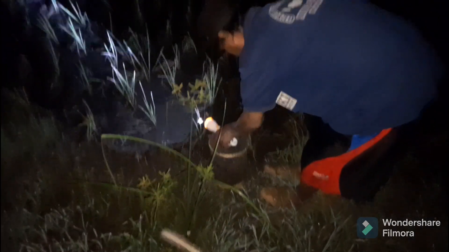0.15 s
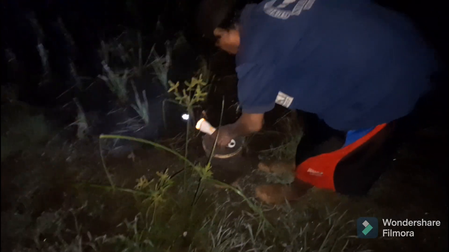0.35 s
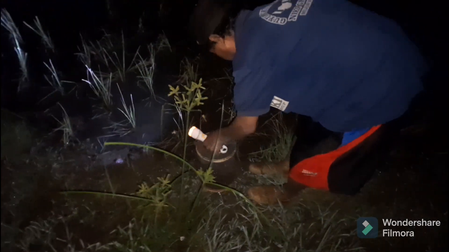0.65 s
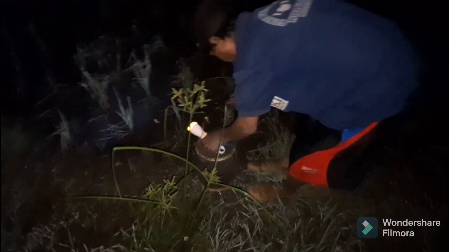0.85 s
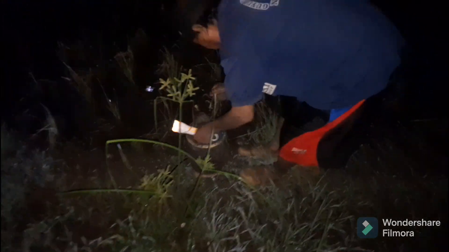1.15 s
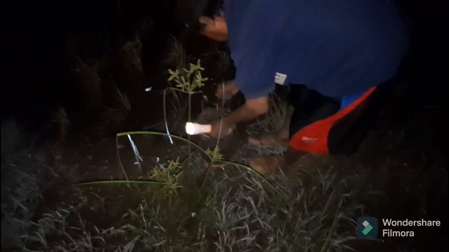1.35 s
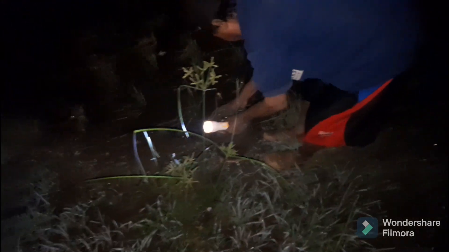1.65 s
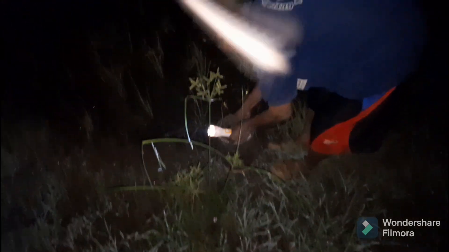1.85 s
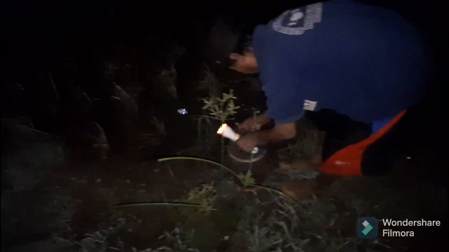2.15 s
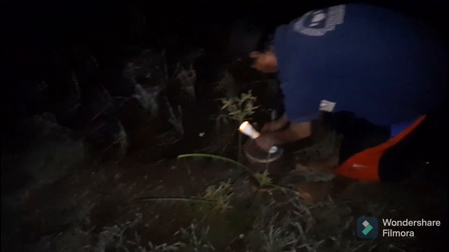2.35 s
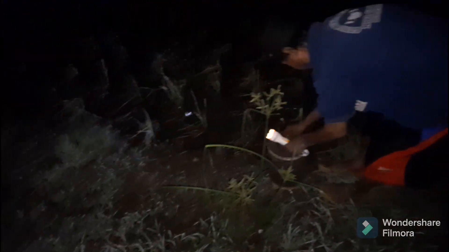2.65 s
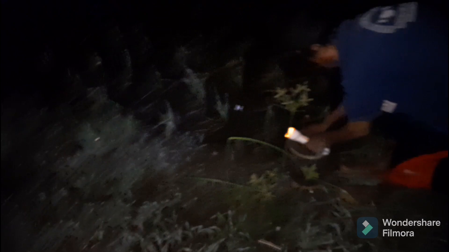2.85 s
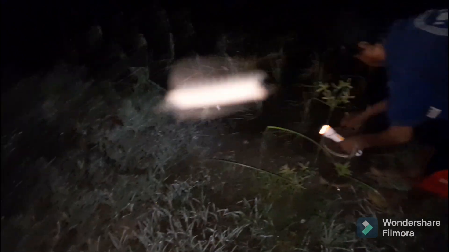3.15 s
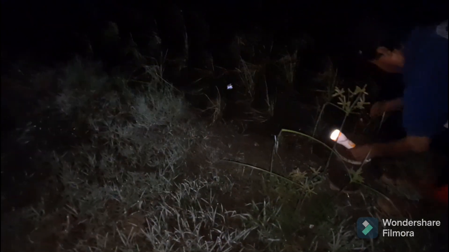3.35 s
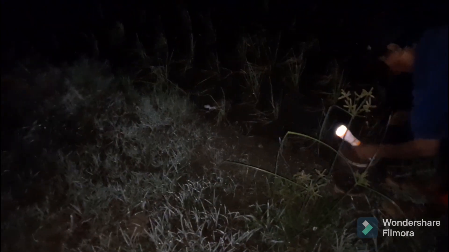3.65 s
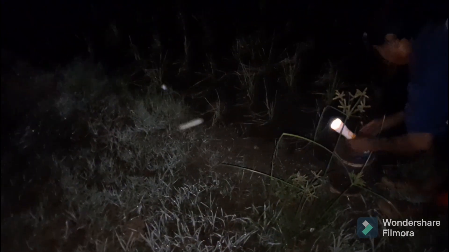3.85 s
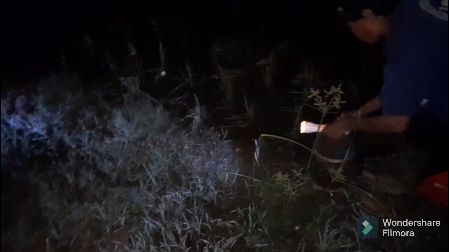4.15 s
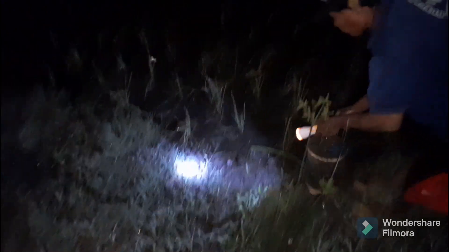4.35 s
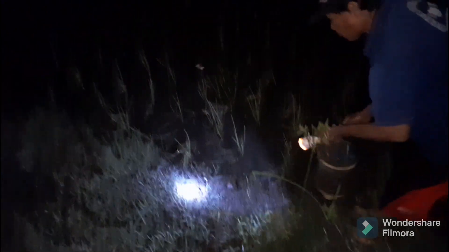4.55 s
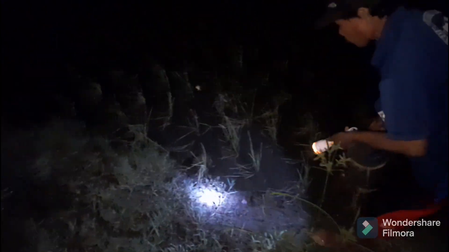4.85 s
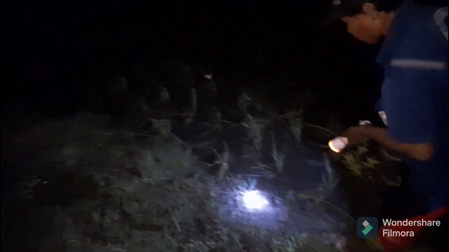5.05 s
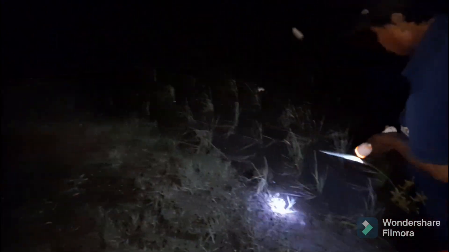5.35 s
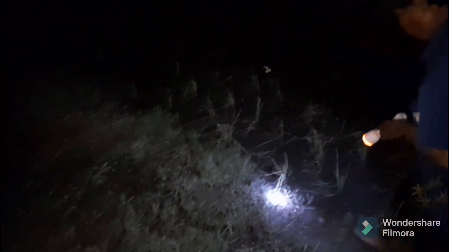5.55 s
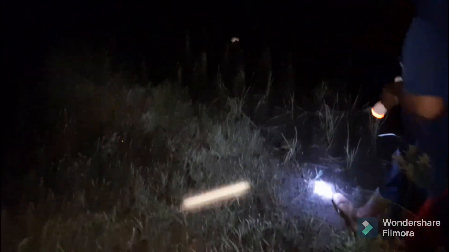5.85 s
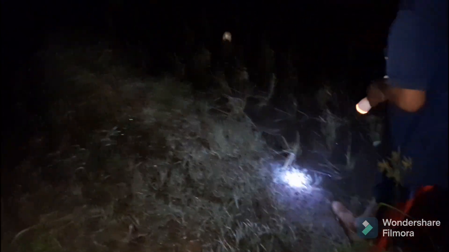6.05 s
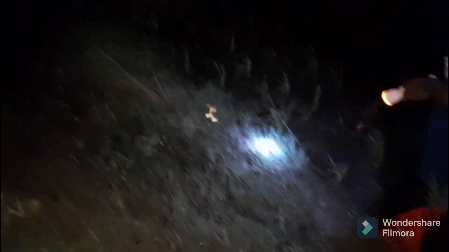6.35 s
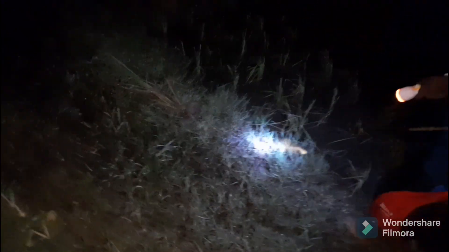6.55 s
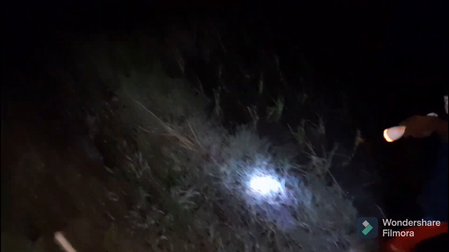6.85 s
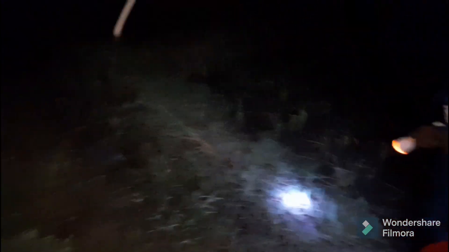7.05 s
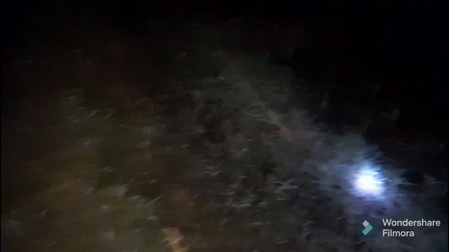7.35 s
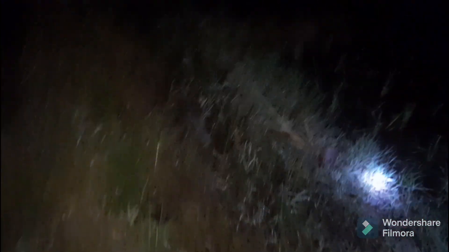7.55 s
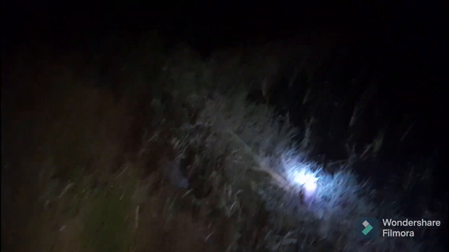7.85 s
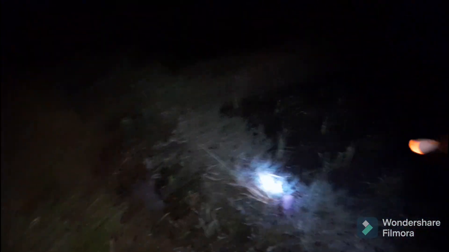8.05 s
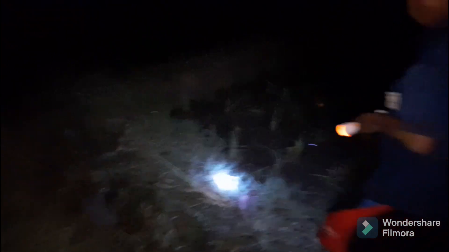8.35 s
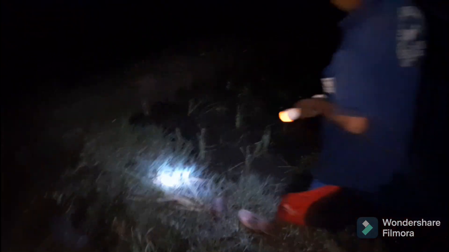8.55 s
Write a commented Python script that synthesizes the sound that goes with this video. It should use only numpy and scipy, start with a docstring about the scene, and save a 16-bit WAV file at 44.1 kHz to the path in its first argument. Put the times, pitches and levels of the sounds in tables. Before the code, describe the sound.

On a river bank at night, crickets drone and chirp over a faint low rumble. Close to the hand-held microphone, rubber boots tread wet ground, tall grass swishes and stalks snap. About a second in, heavy steps thump and a bucket knocks. High insect trills swell midway, the bucket knocks again, and a last few steps land near the end.

```python
"""Night on a river bank, heard on a hand-held phone with two microphone ports. From the start a low
rumble carries from far off, mole crickets drone and small crickets chirp by stridulation. Close by,
rubber boots tread wet ground: tall grass swishes, stalks snap, and near one second heavy steps fall
and a bucket knocks. Midway a boot squeaks and high bush cricket trills swell as the phone turns to
them. After six seconds the bucket knocks again, and the last steps land near the end."""
import sys
import numpy as np
from scipy import signal
from scipy.fft import rfft, irfft, next_fast_len
from scipy.io import wavfile
from scipy.ndimage import uniform_filter1d

SR = 44100
rng = np.random.default_rng(int(sys.argv[2]) if len(sys.argv) > 2 else 0)


def materialize(psi):
    """Save the field psi as 16-bit PCM at rate SR to the path in sys.argv[1].

    A 1-D psi becomes a single channel; in a 2-D psi each row is a channel.
    """
    bounded = np.clip(np.atleast_2d(psi).T, -1, 1)
    quanta = np.round(bounded * 32767).astype(np.int16)
    wavfile.write(sys.argv[1], SR, quanta)


N = 384111
T = np.arange(N) / SR


def undb(db):
    """Decibels to amplitude ratio."""
    return 10 ** (np.asarray(db) / 20)


def unit(x):
    """Normalisation to rms 1."""
    return x / np.sqrt(np.mean(x ** 2))


def curves(table):
    """Linear interpolation of each column through time."""
    s, *columns = np.transpose(table)
    return [np.interp(T, s, c) for c in columns]


def pan(db):
    """Amplitude panning: two gains for a left minus right level difference."""
    return undb(np.array([[db], [-db]]) / 2)


def add(out, s, x):
    """Superposition of a short sound at time s."""
    i = max(int(s * SR), 0)
    out[:, i:i + x.shape[-1]] += x[..., :N - i]


def colour(x, points):
    """Spectral shaping by a curve of (Hz, dB) points."""
    size = next_fast_len(x.shape[-1])
    hz, db = np.transpose(points)
    gain = undb(np.interp(np.log(np.fft.rfftfreq(size, 1 / SR) + 1), np.log(hz), db))
    return irfft(rfft(x, size) * gain, size)[..., :x.shape[-1]]


def resonate(x, hz, width_hz):
    """Two equal resonators in cascade, each width_hz wide, with gain 1 at the centre."""
    b, a = signal.iirpeak(hz, hz / width_hz, fs=SR)
    return signal.lfilter(b, a, signal.lfilter(b, a, x))


def walk(rate):
    """Smooth random modulation of rms 1, with `rate` new values a second."""
    k = int(SR / rate)
    return unit(uniform_filter1d(np.repeat(rng.standard_normal(N // k + 2), k), k)[:N])


def crackle(per_s, spread_db, tail_s):
    """Shot-noise envelope: tiny fractures of random size add in power."""
    ticks = (rng.random(N) < per_s / SR) * undb(np.minimum(spread_db * rng.exponential(size=N), 22))
    power = signal.fftconvolve(ticks ** 2, np.exp(-T[:SR // 50] / tail_s))[:N]
    return unit(np.sqrt(np.abs(power)))


# Each row: frequency in Hz, side minus mid level in dB.
PORT_DIFFERENCE = [(30, -5), (110, -14), (300, -8), (700, 0), (1400, 4.5), (3000, 0.5)]
def diffuse(size):
    """A diffuse field: coherent at the two ports in the bass, unrelated in the treble."""
    mid, side = rng.standard_normal((2, size))
    side = colour(side, PORT_DIFFERENCE)
    return np.array([mid + side, mid - side])


def nearby(size, scatter_db=-2.5):
    """Noise from close by: a direct path to both ports plus diffuse scattering by the stalks."""
    return rng.standard_normal(size) + undb(scatter_db) * diffuse(size)


def scatter(x, decay_s, wet_db, pan_db, lag_ms):
    """Multipath: direct sound, lag_ms later on the right, plus echoes from stalks and ground."""
    t = T[:SR // 4]
    echoes = rng.standard_normal((2, len(t))) * np.exp(-t / decay_s)
    wet = unit(signal.fftconvolve(x[None], echoes, axes=1)[:, :N])
    direct = np.array([x, np.roll(x, round(lag_ms * SR / 1000))])
    return unit(unit(direct) + undb(wet_db) * wet) * pan(pan_db)


# Spectra of the rumble and the hiss. Each row: frequency in Hz, relative density in dB.
RUMBLE_SPECTRUM = [(13, -67), (22, -43), (40, -69), (50, -4.5), (123, 1), (151, -2.5), (174, -8),
                   (216, -15.5), (366, -25.5), (592, -31), (900, -41.5), (1170, -91), (1980, -120)]
AIR_SPECTRUM = [(200, -25), (500, -12), (850, -30), (2000, -20), (3900, -30), (7000, -17.5), (8600, -7.5),
                (10300, -8), (11800, -22.5), (15500, -24)]
# The rumble's course. Each row: time in seconds, relative level in dB.
RUMBLE_LEVELS = [(0, -47.5), (.7, -46), (.9, -37.5), (1.1, -47.5), (1.75, -47), (2.8, -47.5), (4.8, -50),
                 (6.4, -48.5), (7.1, -52.5), (7.35, -47), (8.3, -49), (8.71, -53)]
# The engine's course. Each row: time in seconds, firings per second, level in dB.
ENGINE_RUN = [(0, 25, -43.5), (.7, 25.6, -45), (1.3, 26.1, -53), (1.8, 25.7, -50.5), (3, 27.8, -64.5),
              (8.71, 31, -61.5)]
# Its hum. Each row: multiple of the firing rate, relative level in dB.
ENGINE_HARMONICS = [(3, -16), (4, -7.5), (5, 0), (6, -5.5)]
def distance():
    """Broadband rumble and faint hiss, with a far engine whose harmonics beat at its firing rate."""
    rumble = unit(colour(diffuse(N), RUMBLE_SPECTRUM)) * undb(curves(RUMBLE_LEVELS)[0] - .86)
    rate, engine_db = curves(ENGINE_RUN)
    firings = np.cumsum(rate * (1 + .005 * walk(12))) / SR
    hum = sum(np.sin(2 * np.pi * k * firings) * undb(db + .5 * walk(6.3)) for k, db in ENGINE_HARMONICS)
    air = unit(colour(diffuse(N), AIR_SPECTRUM)) * undb(-66 + .17 * walk(4.5))
    return (rumble + unit(hum) * undb(engine_db)) * pan(.94) + air


def wings(hz, rate, fall, duty, jitter, rough_db, slip):
    """Stridulation: each stroke rings the wing afresh, and the pitch sags as the scraper slows."""
    turns = np.cumsum(rate * (1 + jitter * walk(60))) / SR
    stroke = turns.astype(int)
    offset, strength = rng.standard_normal((stroke[-1] + 1, 2))[stroke].T
    progress = np.minimum(turns % 1 / duty, 1)
    cycles = np.cumsum(hz * (1 - fall * (progress - .5))) / SR
    # each stroke starts about `slip` cycles early or late
    phase = cycles - cycles[np.searchsorted(stroke, stroke)] + slip * offset
    return unit(np.sin(np.pi * progress) * undb(rough_db * strength) * np.sin(2 * np.pi * phase))


# The slow insect's phrases. Each row: middle in seconds, half-length in seconds, level in dB.
SLOW_PHRASES = [(3.42, .11, -79), (3.72, .09, -81), (4.01, .09, -81), (4.27, .05, -82), (4.66, .07, -83),
                (5.35, .1, -81), (5.66, .07, -81)]
def slow_singer():
    """Stridulation slow enough to be heard as separate falling notes, in short phrases."""
    notes = wings(4930, 26.7, fall=.11, duty=.6, jitter=.1, rough_db=1.5, slip=1)
    phrases = sum(undb(db) * np.exp(-((T - s) / half_s) ** 4) for s, half_s, db in SLOW_PHRASES)
    song = scatter(notes * phrases, .008, wet_db=-7, pan_db=1.5, lag_ms=.2)
    return song * np.sqrt(np.mean(phrases ** 2))


# Two small crickets. Each row: chirp length in seconds, pitch in Hz, strokes per second,
# fall in each stroke as a share of pitch.
CRICKET_VOICES = [(.22, 6775, 91, .025), (.2, 7725, 141, .1)]
# Their chirps. Each row: start in seconds, relative level in dB, index of the cricket.
CRICKET_CHIRPS = [(.04, -72, 0), (.58, -73, 0), (1.65, -79, 0), (2.81, -72.5, 0), (3.36, -71.5, 0),
                  (3.916, -70.5, 0), (4.472, -70, 0), (4.99, -68.5, 1), (5.03, -74, 0), (5.48, -69, 1),
                  (7.78, -78, 0)]
def crickets():
    """Sharp wing resonance makes each chirp a short train of nearly pure pulses."""
    out = np.zeros((2, N))
    port_cycles = np.array([[0], [.2]])
    for s, db, which in CRICKET_CHIRPS:
        length, hz, rate, fall = CRICKET_VOICES[which]
        t = T[:int(length * SR)]
        progress = np.minimum(t * rate % 1 / .75, 1)
        slip = rng.random(64)[(t * rate).astype(int) % 64]
        phase = np.cumsum(hz * (1 - fall * (progress - .5))) / SR + slip
        strokes = np.sin(np.pi * progress) * signal.windows.tukey(len(t), .1)
        add(out, s, undb(db + 10.5) * strokes * np.sin(2 * np.pi * (phase + port_cycles)))
    return out


# Bush crickets. Each row: pitch in Hz, strokes per second, fall as a share of pitch, duty cycle,
# jitter as a share of stroke rate, throbs per second, throb depth in dB, pan in dB, right lag in ms.
TRILLS = [(10380, 131.3, .12, .75, .002, 0, 0, 3, .38), (9680, 100.9, .1, .6, .002, 0, 0, 5, .41),
          (9270, 122.6, .09, .7, .01, 7.7, 8, 4, .34), (8500, 127, .08, .65, .04, 8.1, 6, 7, .25),
          (10850, 118, .08, .7, .02, 0, 0, 0, .1), (15050, 100.9, .1, .65, .01, 0, 0, 0, .3),
          (9650, 120, .1, .7, .02, 0, 0, 3, .3)]
# The phone's turn past each. Each row: time faced in seconds, half-width in seconds,
# level when faced in dB, level when turned away in dB.
TRILL_FACING = [(3.62, 1.1, -66.5, -75.5), (3.2, 2.6, -70, -79), (4.3, 1.7, -68, -85),
                (6.35, 1.9, -72, -87), (5, 1.2, -74.5, -85), (3.6, 2.2, -81, -90), (6.1, .22, -71, -95)]
def bush_crickets(sag_per_s=.004):
    """High stridulation, shaped by directivity: each trill swells as the phone turns to it."""
    out = 0
    for trill, (faced_s, width_s, faced_db, away_db) in zip(TRILLS, TRILL_FACING):
        hz, rate, fall, duty, jitter, throb_rate, throb_db, pan_db, lag_ms = trill
        t = T - faced_s
        pitch = hz * (1 - sag_per_s * t + .005 * walk(3))
        throbs = throb_rate * t + .08 * walk(3)
        song = wings(pitch, rate, fall, duty, jitter, rough_db=1.5, slip=1)
        song *= undb(throb_db * np.cos(2 * np.pi * throbs) + .7 * walk(3))
        level_db = away_db + (faced_db - away_db) / (1 + (t / width_s) ** 2)
        out = out + scatter(song, .008, -12, pan_db, lag_ms) * undb(level_db)
    return out


# The drone as the phone turns. Each row: time in seconds, relative level in dB, pan in dB.
DRONE_LEVELS = [(0.0, -54, 3), (0.56, -55.5, 2), (1.19, -51, 0.5), (1.82, -53, -1), (3.06, -58, 8),
                (3.42, -59, 1), (4.95, -59.5, 7.5), (5.63, -59.5, -3), (6.65, -53.5, -5), (6.99, -57, -3),
                (7.37, -59.5, -12), (8.05, -57.5, -3.5), (8.42, -56.5, -8), (8.71, -58, 4)]
def mole_crickets():
    """Regular stridulation from one near burrow buzzes; incoherent far ones blur into a band."""
    near = wings(3075, 154.1, fall=.085, duty=.7, jitter=.003, rough_db=1.2, slip=.21)
    near = scatter(near, .015, wet_db=-14, pan_db=1, lag_ms=-.34)
    far = wings(2980, 124, fall=.07, duty=.85, jitter=.03, rough_db=2, slip=1)
    far += wings(3120, 143, fall=.07, duty=.7, jitter=.03, rough_db=2, slip=1)
    far = scatter(far, .04, wet_db=3, pan_db=1, lag_ms=.1)
    drone_db, pan_db = curves(DRONE_LEVELS)
    # the near one is shaded as the phone turns, the surrounding chorus less so
    near *= undb(drone_db - .7 + np.array([pan_db, -pan_db]) / 2)
    return near + far * undb(.45 * drone_db - 34.1)


# Grass that never quite settles. Each row: time in seconds, relative level in dB.
STIR_LEVELS = [(0, -64.5), (1.7, -70.5), (3.2, -69.5), (3.7, -75.5), (4.4, -74.5), (5.5, -72.5),
               (8.71, -75)]
# Offsets in dB for its ticking, dry hiss and swish.
STIR_OFFSETS = (-1, -11, 5.5)
# A leg or arm sweeps the grass. Each row: start, swell time and length in seconds,
# then relative levels of ticking, dry hiss and swish in dB.
LIMB_SWEEPS = [(0, 0.049, 0.22, -58, -70, -58), (0.118, .07, 0.059, -57.5, -67, -69),
               (0.298, .04, 0.17, -61, -69, -61), (0.67, 0.058, 0.15, -59.5, -70, -62),
               (0.921, .03, 0.078, -55.5, -65, -57.5), (1.1, 0.07, 0.19, -65.5, -70, -61),
               (1.88, 0.051, 0.22, -68.5, -83, -64.5), (2.255, .055, 0.11, -59.5, -77, -58.5),
               (2.499, 0.06, 0.3, -67.5, -86, -63), (2.694, 0.037, 0.31, -68, -82, -67),
               (3.24, 0.048, 0.06, -67.5, -79, -70), (4.579, .08, 0.62, -77, -81, -69.5),
               (4.92, 0.11, 0.24, -64.5, -77, -63.5), (5.737, 0.11, 0.18, -66, -73, -64),
               (6.077, 0.084, 0.1, -64, -74, -58), (6.375, 0.097, 0.15, -67, -75, -61.5),
               (6.647, 0.053, 0.2, -68, -81, -69), (7.095, 0.07, 0.29, -64, -72, -61.5),
               (7.56, .06, 0.35, -70.5, -86, -88), (8.01, 0.043, 0.073, -67, -83, -67),
               (8.22, 0.078, 0.41, -62, -67, -61)]
def sweeps(release_s=.12):
    """Envelopes of ticking, hiss and swish: sweeps add in power and decay as blades spring back."""
    power = (undb(STIR_OFFSETS)[:, None] * undb(curves(STIR_LEVELS)[0])) ** 2
    t = T[:SR]
    for s, swell_s, length, *dbs in LIMB_SWEEPS:
        push = np.minimum(t / swell_s, 1) * np.exp(-np.maximum(t - length, 0) / release_s)
        add(power, s, (undb(dbs)[:, None] * push) ** 2)
    return np.sqrt(power)


# Spectra of the ticking and the swish. Each row: frequency in Hz, relative density in dB.
TICK_SPECTRUM = [(300, 5.5), (1000, -8.5), (2500, 6), (4000, 5), (5200, 4), (6600, 7.5), (8500, 4.5),
                 (10500, 1), (12000, -3), (15500, -13.5)]
SWISH_SPECTRUM = [(250, 11), (500, 1), (900, -3), (1500, 4), (2200, 6), (2700, 2), (3600, -6.5),
                  (6000, -93)]
def grass():
    """Friction noise: blades slide with a swish and catch in tiny ticks; dry ones hiss higher."""
    ticking, hissing, sliding = sweeps()
    fine_grain = unit(crackle(2100, spread_db=.5, tail_s=.0029) + 4)
    crisp = unit(colour(diffuse(N) * fine_grain, TICK_SPECTRUM)) * ticking * undb(5)
    hiss = unit(resonate(diffuse(N) * fine_grain, 20000, 10000)) * hissing * undb(10)
    rubbing = nearby(N) * unit(crackle(700, spread_db=4, tail_s=.0011) + 5)
    swish = unit(colour(rubbing, SWISH_SPECTRUM)) * sliding
    flicker = undb(1.4 * walk(25) + 1.5 * walk(110))
    return ((crisp + hiss) * pan(.17) + swish * pan(-4.6)) * flicker


def blades():
    """Impulsive excitation: single blades flick free during a sweep and tick in five bands."""
    ticks = sum(unit(resonate(diffuse(N) * crackle(55, spread_db=5, tail_s=.0012), hz, hz * .6))
                for hz in (2200, 4000, 6000, 7800, 11500))
    return unit(ticks) * sweeps()[0] * undb(-2.5)


# Stalks and twigs breaking. Each row: start in seconds, level in dB, pitch in Hz, decay in seconds.
STALK_SNAPS = [(.2, -42, 7200, .02), (.56, -44.5, 6900, 0.0072), (0.816, -36.5, 4570, .007),
               (.934, -43, 5200, 0.005), (1.797, -47, 6500, 0.0057), (2.016, -52, 3700, 0.0059),
               (2.136, -47, 7500, 0.0045), (2.354, -35, 750, 0.0078), (2.355, -42, 2100, .005),
               (2.678, -38.5, 1410, .008), (2.84, -47, 4660, 0.0065), (2.939, -53, 6500, 0.0056),
               (3.284, -46.5, 7500, 0.015), (3.432, -44, 2130, 0.0098), (3.437, -44, 6900, .009),
               (4.128, -40.5, 1870, 0.011), (4.129, -48, 5900, 0.006), (5.014, -44.5, 6440, 0.02),
               (5.101, -47, 6340, .006), (4.752, -45, 1500, .004), (5.312, -46, 1900, .005),
               (5.599, -47, 1200, 0.002), (5.763, -45, 2200, 0.0038), (5.854, -38, 1090, 0.0023),
               (5.854, -50, 7600, .004), (6.47, -50, 3660, .014), (8.028, -50, 6800, .005),
               (8.038, -52, 5500, 0.0049)]
def snaps(crack_s=.00037):
    """Brittle fracture: a sharp crack, then a brief damped ring; thick stalks sound lower."""
    out, t = np.zeros((2, N)), T[:SR // 16]
    for s, db, hz, ring_s in STALK_SNAPS:
        body = unit(resonate(nearby(len(t)), hz, hz * .53))
        add(out, s, body * undb(db) * (np.exp(-t / crack_s) + undb(-9) * np.exp(-t / ring_s)))
    return out


# Knocks on the bucket. Each row: start in seconds, level in dB, frequency the struck spot favours
# in Hz, pitch ratio as the grip changes, pan in dB.
BUCKET_KNOCKS = [(.817, -33, 1670, 1.015, 2), (0.934, -41.5, 1100, .97, -1), (6.117, -43.5, 650, 1.07, -1),
                 (6.574, -41.5, 1090, 1.005, -6), (6.687, -43, 710, 1.02, 1)]
# Its modes. Each row: frequency in Hz, relative level in dB, decay in seconds.
BUCKET_RESONANCES = [(537, 6, 0.025), (994, -0.5, 0.021), (1222, -0.5, 0.0067), (1315, -4, 0.016),
                     (1547, -3, 0.015), (2056, 3, 0.0092), (2300, 1, 0.0088)]
def bucket(focus_db_per_octave=12.5):
    """Modal vibration: every knock rings the same damped modes, weighted by where it strikes."""
    out, t = np.zeros((2, N)), T[:SR // 5]
    for s, db, spot_hz, ratio, pan_db in BUCKET_KNOCKS:
        for hz, mode_db, decay in BUCKET_RESONANCES:
            phase = ratio * hz * t + rng.random() + .077 * rng.standard_normal((2, 1))
            gain = undb(db + mode_db - focus_db_per_octave * abs(np.log2(hz / spot_hz)))
            add(out, s, gain * np.sin(2 * np.pi * phase) * np.exp(-t / decay) * pan(pan_db))
    return out


# One slip: middle in seconds, half-length in seconds, pitch in Hz, rise per second as a share of pitch.
RUBBER_SLIP = (3.411, 0.0062, 425, 10)
# Levels of its harmonics in dB, from the fundamental up.
SLIP_HARMONICS = (-53.5, -53, -58, -67)
def squeak():
    """Friction tone: wet rubber slips with a very short rising squeak on the left."""
    out, t = np.zeros((2, N)), T[:SR // 10] - T[SR // 20]
    s, half_s, hz, rise = RUBBER_SLIP
    cycles = np.cumsum(hz * (1 + rise * t)) / SR
    tone = sum(undb(db) * np.sin(2 * np.pi * k * cycles) for k, db in enumerate(SLIP_HARMONICS, 1))
    add(out, s + t[0], tone / np.cosh(t / half_s) * pan(20))
    return out


# Air pockets opening. Each row: start in seconds, pitch in Hz, rise per second as a share of pitch,
# level in dB, brightness in dB per octave, pan in dB.
AIR_POCKETS = [(0.053, 442, 5.8, -50.5, -3, 0), (.826, 427.3, 0.62, -36.5, -11, 5),
               (.941, 427, 1.3, -37.5, 0.5, 2)]
# A pocket's modes. Each row: multiple of its pitch, relative level in dB, decay in seconds.
CAVITY_MODES = [(0.998, -0.5, 0.04), (1.802, -3, 0.021), (2.38, -7, 0.012), (3.7, -17, 0.0076)]
def plops(flutter_depth=.55):
    """Cavity resonance: air pockets under the sole flutter in the mud and rise in pitch as they shrink."""
    out, t = np.zeros((2, N)), T[:SR // 12]
    for s, hz, rise, db, bright_db, pan_db in AIR_POCKETS:
        cycles = np.cumsum(hz * (1 + rise * t)) / SR
        for k, mode_db, decay in CAVITY_MODES:
            flutter = 1 + flutter_depth * unit(uniform_filter1d(rng.standard_normal(len(t)), size=150))
            fade = (1 - np.exp(-t / .0014)) * np.exp(-t / decay) * (1 - (t / t[-1]) ** 2)
            ring = flutter * np.sin(2 * np.pi * k * cycles) * fade
            add(out, s, ring * undb(db + mode_db + bright_db * np.log2(k)) * pan(pan_db))
    return out


# Soles sliding. Each row: middle in seconds, half-length in seconds, level in dB, pitch in Hz,
# grit relative to the rub in dB.
SOLE_SLIDES = [(0.998, 0.012, -47, 643, 2.5), (2.325, .025, -57, 487, -8), (2.582, .06, -60.5, 1400, -9),
               (2.618, 0.022, -50, 616, -8), (5.91, 0.033, -56.5, 393, -14), (6.2, 0.016, -56.5, 466, -2),
               (6.236, 0.017, -49.5, 500, -19), (6.809, 0.052, -65.5, 625, -3),
               (8.101, 0.016, -53.5, 370, -17), (8.266, 0.015, -58, 430, -3)]
def scuffs():
    """Sliding friction on soft ground: a dull rub swells and fades, with grit above it."""
    out, t = np.zeros((2, N)), T[:SR // 3] - T[SR // 6]
    for s, half_s, db, hz, grit_db in SOLE_SLIDES:
        rub = unit(resonate(nearby(len(t)), hz, hz * .73))
        grit = unit(resonate(nearby(len(t)), 1660, 1800))
        add(out, s + t[0], (rub + grit * undb(grit_db)) * undb(db) / np.cosh(t / half_s))
    return out


# Heavy footfalls. Each row: start in seconds, pitch in Hz, decay in seconds, level in dB.
HAND_THUMPS = [(0.739, 109, 0.0062, -16.5), (.82, 97.3, 0.085, -29.5), (0.883, 117, 0.022, -20.5),
               (0.941, 102, 0.016, -29), (8.081, 88, 0.038, -35)]
def thumps():
    """Structure-borne sound: heavy footfalls shake the hand in a low damped oscillation."""
    out, t = np.zeros((2, N)), T[:SR // 4]
    for s, hz, decay, db in HAND_THUMPS:
        fade = (1 - np.exp(-t / .0098)) * np.exp(-t / decay)
        add(out, s, undb(db) * np.sin(2 * np.pi * hz * t) * fade)
    return out


# Boots on wet ground. Each row: start in seconds, relative levels of the whole step, its thud
# and its crunch in dB, decay in seconds.
FOOTSTEPS = [(.05, -36, -18, -5, 0.014), (0.481, -45.5, -7, 9, 0.01), (.73, -51, 17, -3, 0.012),
             (.781, -35.5, -14, 7, 0.015), (0.8164, -24, -7, 3, 0.014), (.828, -39.5, 14, -10, 0.014),
             (.85, -47.5, 17.5, -10, 0.0085), (.934, -31, 3, 2, 0.016), (1.012, -28.5, 7.5, 0, 0.0065),
             (1.072, -43, 11.5, -9, 0.0061), (2.352, -29.5, -15, 1, 0.008), (2.455, -33, -10, 1, 0.01),
             (3.124, -45.5, -22, -3, 0.034), (3.474, -36.5, -24, -19, 0.01), (4.104, -45, -22, 1, 0.02),
             (4.26, -42, -4, 6, .0075), (4.646, -46, -20, 1.5, 0.015), (4.724, -46.5, -20, 0, 0.042),
             (5.312, -43, -17, -6, 0.012), (6.098, -46.5, 11.5, 0, 0.014), (6.116, -35.5, -13, -4, 0.016),
             (6.574, -38, -16, -1, 0.014), (6.686, -43.5, 1.5, 2, 0.069), (8.078, -46.5, -2, 11.5, 0.011),
             (8.246, -53, 2, 13, 0.014)]
def boots(attack_share=.033):
    """Damped impact: each step excites a thud, a grainy squelch and a crunch of flattened stalks."""
    out, t = np.zeros((2, N)), T[:SR // 4]
    grain = crackle(570, spread_db=1, tail_s=.00065)
    for s, db, thud_db, crunch_db, decay in FOOTSTEPS:
        push = nearby(len(t)) * grain[int(s * SR):][:len(t)]
        fade = (1 - np.exp(-t / (attack_share * decay))) * np.exp(-t / decay)
        thud = unit(resonate(push, 325, 310)) * undb(thud_db) * fade ** .5
        squelch = unit(resonate(push, 610, 720)) * undb(2) * fade
        crunch = unit(resonate(push, 1380, 1650)) * undb(crunch_db + 1.7) * fade ** 1.5
        add(out, s, (thud + squelch + crunch * pan(1)) * undb(db - 13))
    return out


def pressing(build_s=.086):
    """Compression of wet stalks: they crackle before and after each step, and faintly in between."""
    power = undb(-94) ** 2
    for s, db, *_ in FOOTSTEPS:
        power += undb(-40 + .6 * db) ** 2 * np.exp(-2 * np.minimum(np.abs(T - s) / build_s, 20))
    ticks = nearby(N) * crackle(110, spread_db=10, tail_s=.01)
    return unit(resonate(ticks, 490, 1200)) * np.sqrt(power)


def scene():
    """Superposition of the insects all round, the walker close by and the distance behind."""
    insects = mole_crickets() + bush_crickets() + slow_singer() + crickets()
    stalks = grass() + blades() + snaps() + pressing()
    walker = boots() + thumps() + scuffs() + plops() + squeak() + bucket()
    return insects + stalks + walker + distance()


def record(dry):
    """Port resonance colours the right channel; band limiting cuts the deepest bass and the top."""
    left, right = dry
    right = right + undb(2) * resonate(right, 2375, 1470)
    out = signal.sosfilt(signal.butter(2, 26, "high", fs=SR, output="sos"), np.array([left, right]))
    return signal.sosfilt(signal.ellip(10, .2, 70, 15800, fs=SR, output="sos"), out)


dry = scene()
out = record(dry)
materialize(out)
```